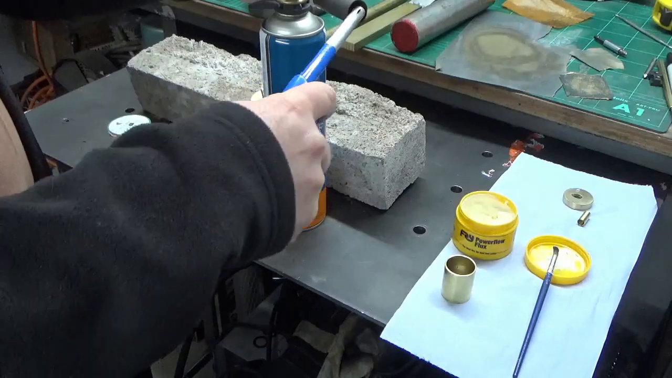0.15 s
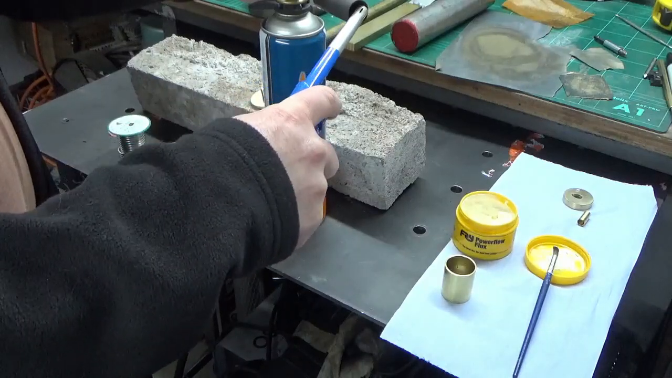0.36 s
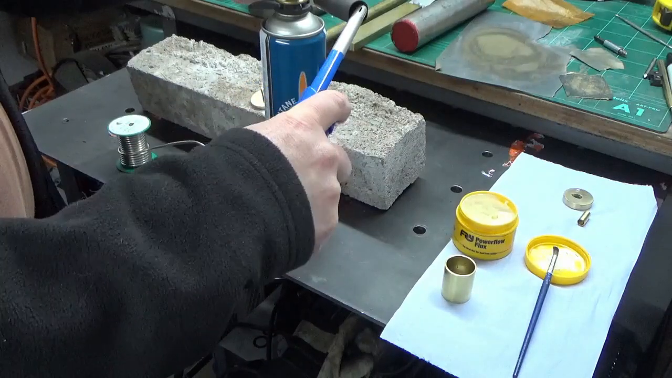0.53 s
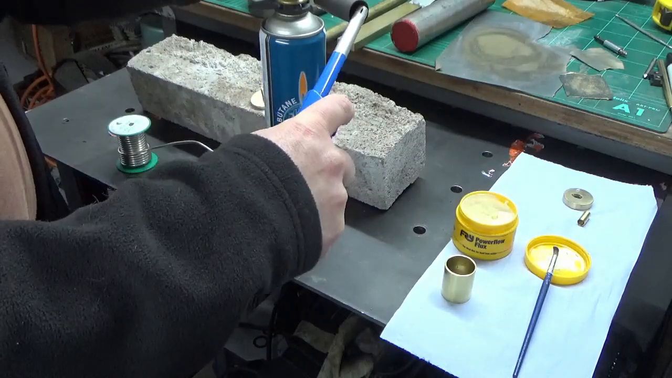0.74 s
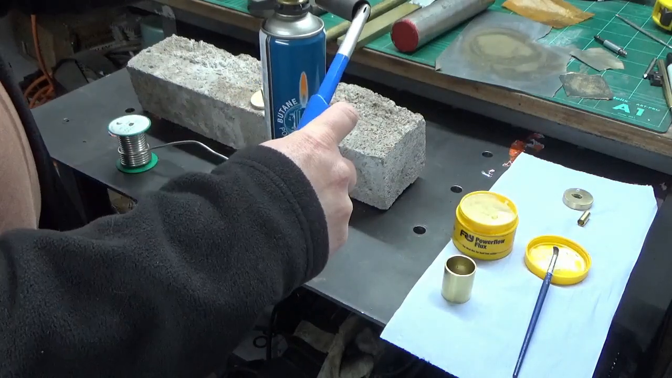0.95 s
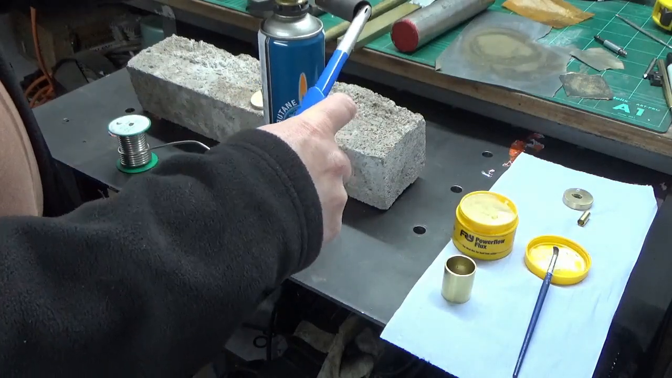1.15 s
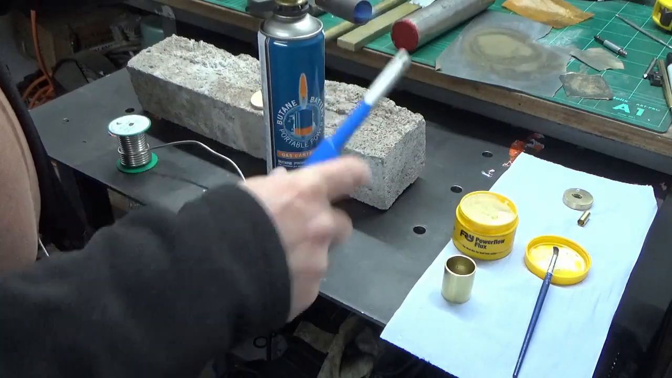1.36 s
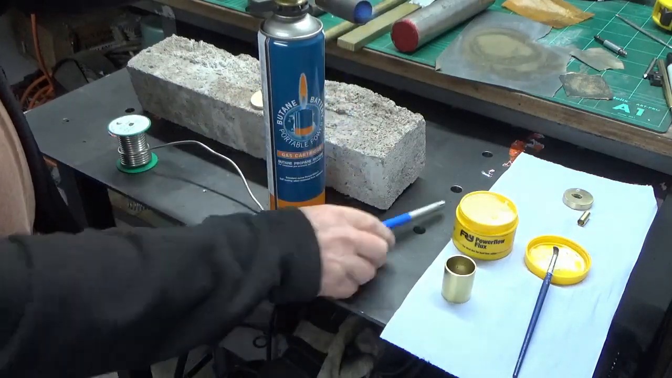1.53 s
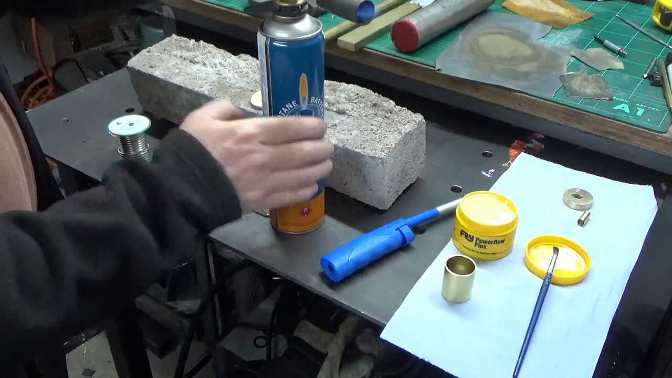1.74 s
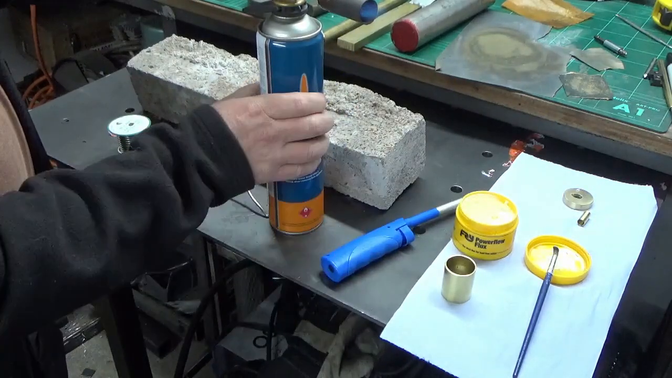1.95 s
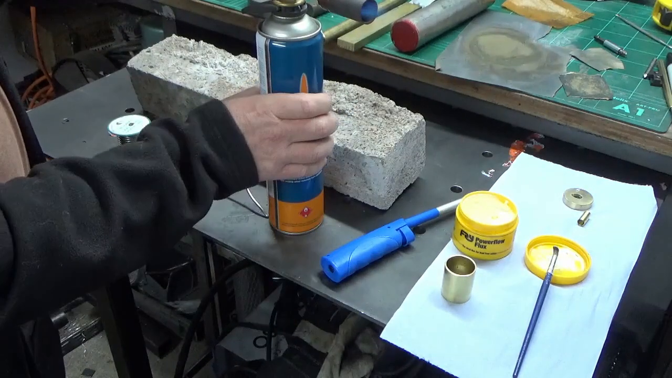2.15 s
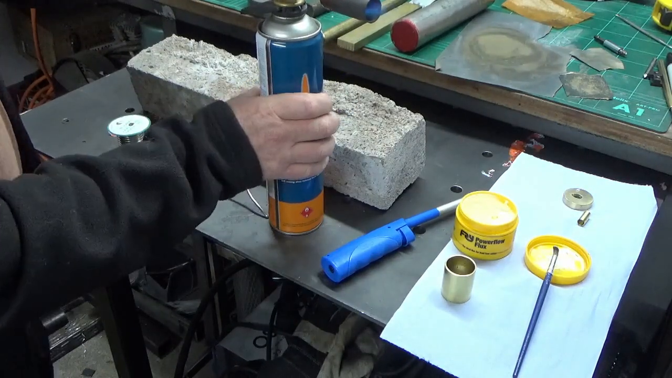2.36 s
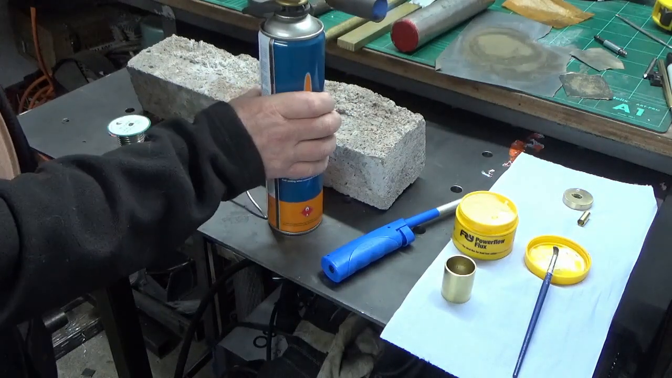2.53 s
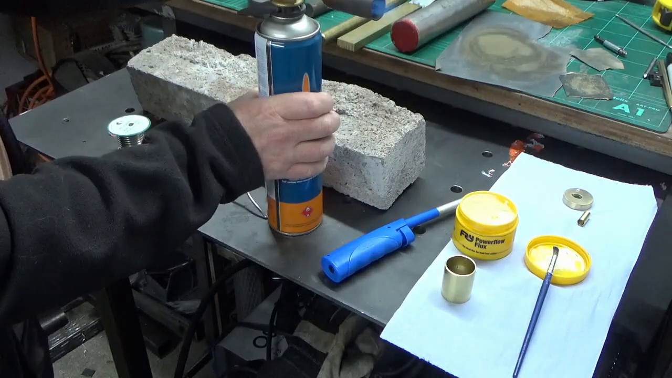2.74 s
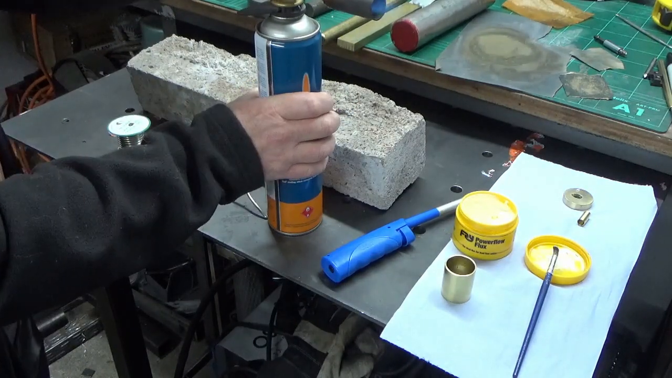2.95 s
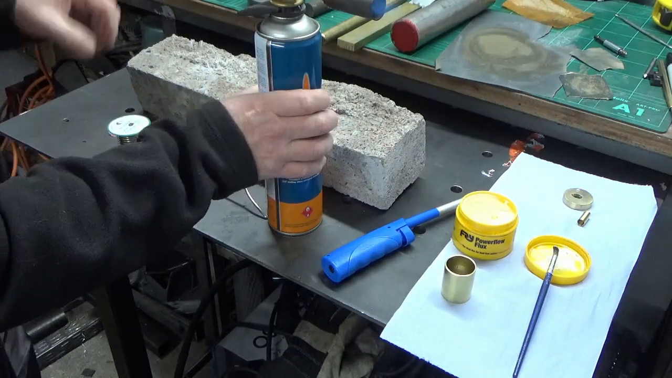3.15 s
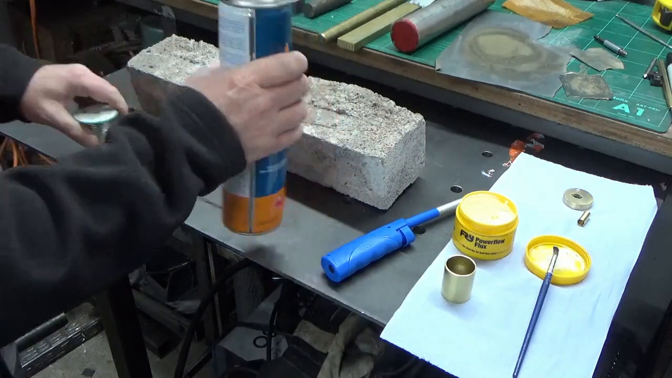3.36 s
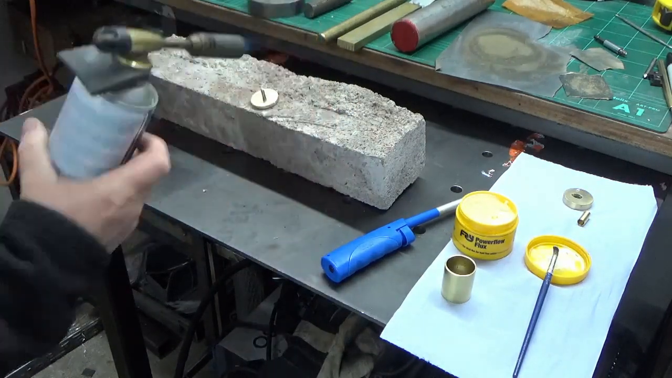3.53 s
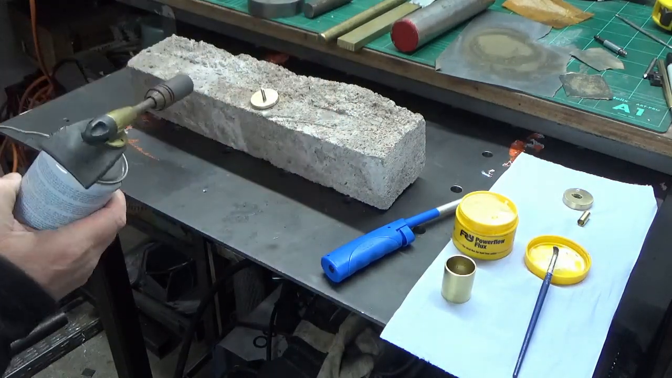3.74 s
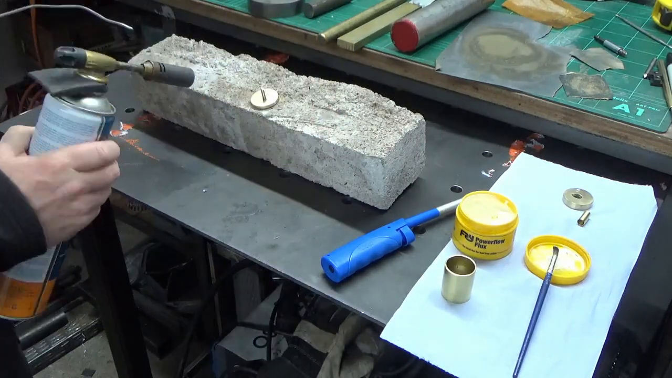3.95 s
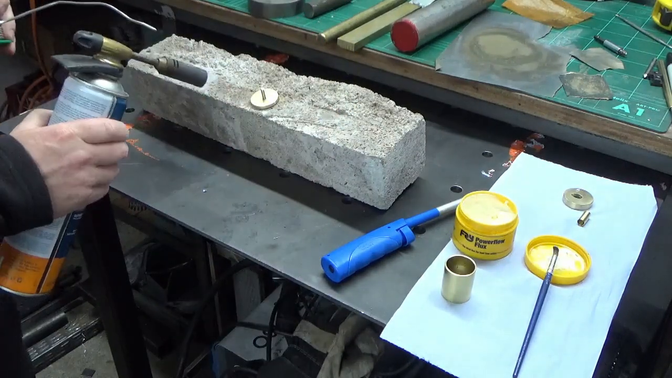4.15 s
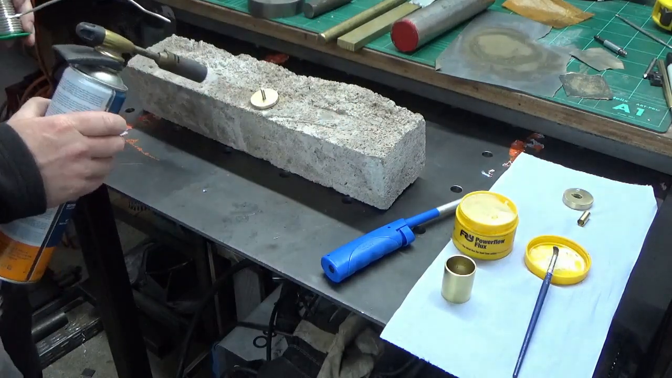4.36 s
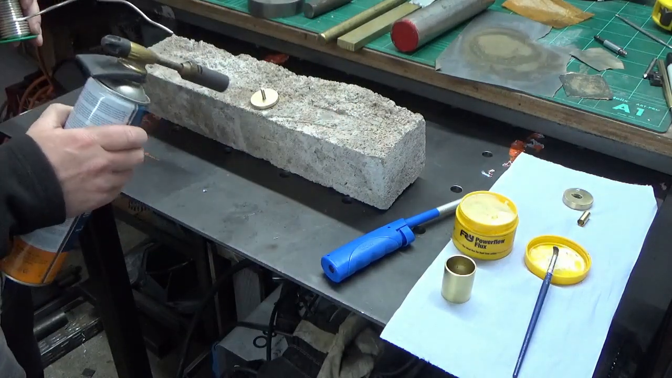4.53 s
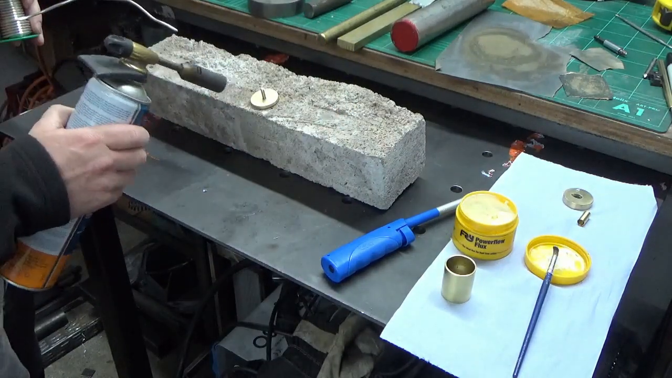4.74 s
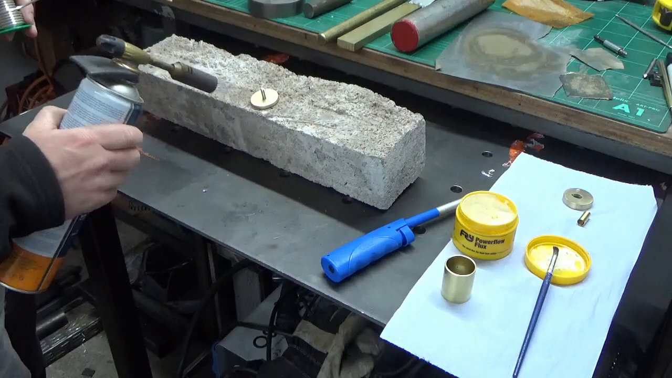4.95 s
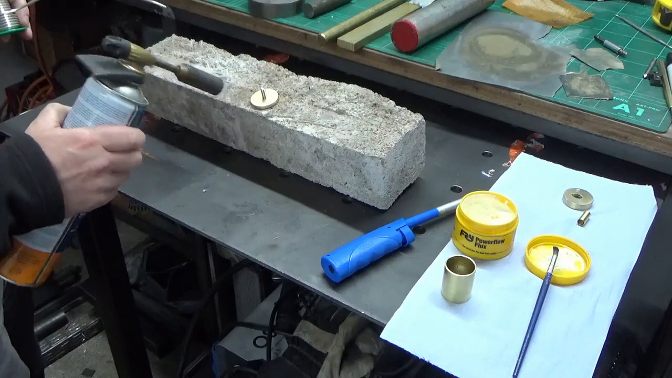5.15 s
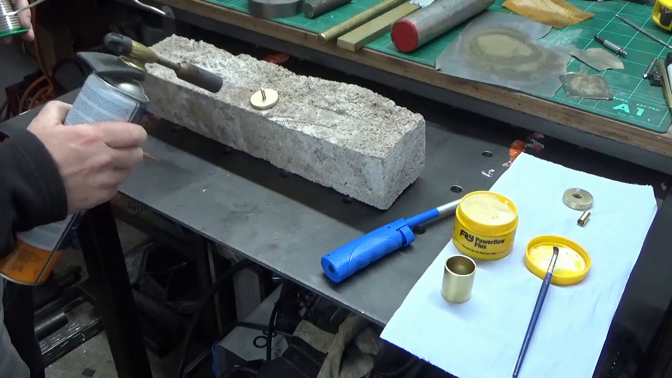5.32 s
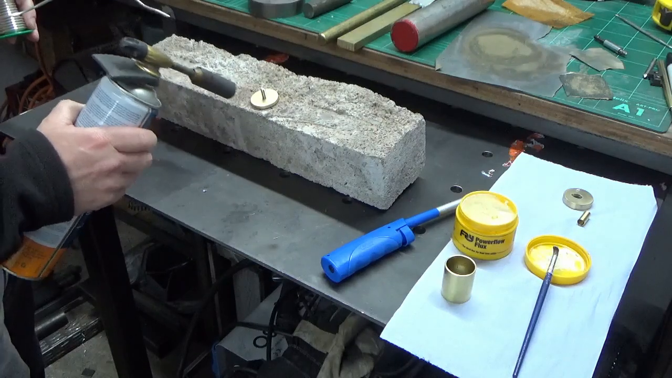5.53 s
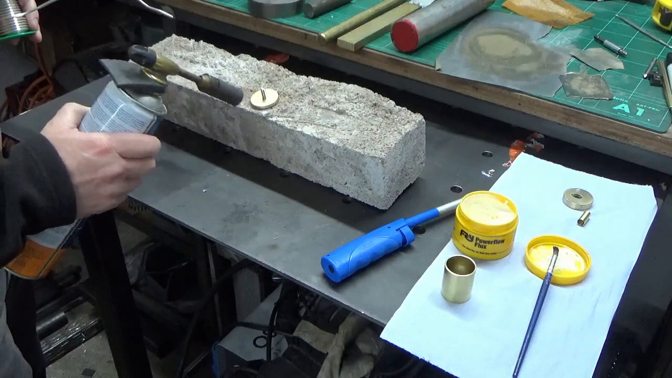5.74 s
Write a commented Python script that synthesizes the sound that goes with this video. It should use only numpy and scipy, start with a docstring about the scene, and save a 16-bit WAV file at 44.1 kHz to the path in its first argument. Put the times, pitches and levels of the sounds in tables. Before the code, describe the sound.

Close stereo pickup at a bench with a short, dry room. Bright, brittle lighter snaps about six per second, each followed by a smaller trigger tick and thin metallic ringing. Puffs of igniting gas merge into a broadband torch rush slightly left. It jumps louder midway, then its tone sweeps as the torch moves and settles into a hollow, resonant, trembling hiss.

```python
"""A butane blowtorch is lit at a workshop bench, over room noise, a faint gas leak and a low hum.
Eight snaps of a piezo lighter: noise cracks and ringing modes, with trigger ticks, rubs and creaks between.
The gas catches in sputtering pressure puffs; filtered noise with tiny pops then roars and hisses.
The valve opens in three surging steps; the torch is lifted, then aimed at a part on a firebrick.
Each position has its own resonances; echoes off bench and brick sweep through the jet noise."""
import sys
import numpy as np
from scipy import signal
from scipy.fft import rfft, irfft
from scipy.io import wavfile
from scipy.ndimage import map_coordinates

SR = 44100
rng = np.random.default_rng(int(sys.argv[2]) if len(sys.argv) > 2 else 0)


def to_wav(sig):
    """Store sig (one row per channel, or 1-D mono) as 16-bit WAV at the path in sys.argv[1].

    Samples outside -1..1 are clipped; the rate is SR.
    """
    pcm = np.clip(np.atleast_2d(sig), -1, 1) * 32767
    pcm = np.round(pcm).astype(np.int16)
    wavfile.write(sys.argv[1], SR, pcm.T)  # frames by channels


N = 259749
TIME = np.arange(N) / SR
FREQ = np.maximum(np.arange(N // 2 + 1) * SR / N, 1)
LIT_S = 1.281


def from_db(db):
    """Decibels to gain."""
    return 10 ** (np.asarray(db) / 20)


def rms_one(x):
    """Scale to unit rms."""
    return x / np.sqrt(np.mean(x ** 2) + 1e-20)


def ramp(start_s, length_s):
    """Even rise from 0 to 1."""
    return np.clip((TIME - start_s) / length_s, 0, 1)


def swell(centre_s, length_s):
    """Smooth bump of height 1; length is the full width at 1/e."""
    return np.exp(-np.minimum((2 * (TIME - centre_s) / length_s) ** 2, 20))


def since(start_s):
    """Seconds elapsed after a moment; 0 before it."""
    return np.maximum(TIME - start_s, 0)


def drift(rate_hz):
    """Slow random motion, rms 1."""
    return rms_one(irfft(rfft(rng.standard_normal(N)) / (1 + (FREQ / rate_hz) ** 2), N))


def gain_at(points):
    """(freq_hz, level_db) table as a gain at every frequency."""
    freq_hz, level_db = np.transpose(points)
    return from_db(np.interp(np.log(FREQ), np.log(freq_hz), level_db))


def colour(x, points):
    """Minimum-phase filter of unit power gain, shaped by a (freq_hz, level_db) table."""
    cepstrum = irfft(np.log(rms_one(gain_at(points))), N)
    fold = np.r_[1, np.full(N // 2, 2), np.zeros(N - N // 2 - 1)]
    response = np.exp(rfft(cepstrum * fold))
    return irfft(rfft(x) * response, N)


def brighten(x, treble_db, corner_hz):
    """Shift the treble by a level that may vary in time."""
    high_pass = signal.butter(3, corner_hz, "high", fs=SR, output="sos")
    return x + (from_db(treble_db) - 1) * signal.sosfiltfilt(high_pass, x)


def read_at(x, seconds):
    """Read both channels at shifted times."""
    return np.array([map_coordinates(channel, [seconds * SR], order=3, mode="mirror") for channel in x])


def stereo_noise(side_db):
    """White noise mostly common to both channels."""
    mid, side = rng.standard_normal((2, N))
    return mid + from_db(side_db) * side * [[1], [-1]]


def room(x, wet_db, t60, direct=1):
    """Direct sound plus a dense decaying tail from bench and walls."""
    age_s = TIME[:SR // 2]
    tail = stereo_noise(-9.0)[:, :len(age_s)] * from_db(-60 * age_s / t60) * (age_s > .001)
    tail = tail / np.sqrt(np.sum(tail ** 2) / 2)
    wet = signal.fftconvolve(np.atleast_2d(x), tail, axes=1)[:, :N]
    return direct * x + from_db(wet_db) * wet


def strikes(rows, t60):
    """Sum of envelopes that jump at each (start_s, level_db) and decay exponentially."""
    envelope = np.zeros(N)
    for start_s, level_db, *_ in rows:
        decay_db = 60 * np.clip(TIME - start_s, 0, 2 * t60) / t60
        envelope += from_db(level_db - decay_db) * (TIME >= start_s)
    return envelope


def ringing(hits, modes, vary_db):
    """Each (start_s, level_db) hit excites every decaying mode at random phase and varied strength."""
    out, age_s = np.zeros(N), TIME[:SR // 2]
    for start_s, hit_db in hits:
        start = round(start_s * SR)
        for freq_hz, mode_db, t60_s in modes:
            height = from_db(hit_db + mode_db + rng.normal(0, vary_db) - 60 * age_s / t60_s)
            out[start:start + len(age_s)] += height * np.sin(2 * np.pi * (freq_hz * age_s + rng.random()))
    return out


# room noise and unlit gas leaking from the jet: freq_hz, level_db (relative, per Hz)
FLOOR_COLOUR = [(25, -8), (100, -7), (300, -5), (700, -3.5), (1200, -2), (2300, -5), (3500, -2.5),
                (5000, -7), (7000, 2.5), (9000, -6), (12300, -3.5), (16000, -5)]
# hum tones: freq_hz, level_db
HUM_TONES = [(61, -86), (75.4, -83.5)]
# bench rumble under the flame: freq_hz, level_db (relative, per Hz)
RUMBLE_COLOUR = [(20, -13), (48, -13), (62, -2), (80, 0), (100, -10), (125, -9), (155, -3), (185, -14),
                 (400, -30), (2000, -70)]
RUMBLE_START_DB, RUMBLE_GROWS_DB_PER_S = -77, 1.5


def workshop(floor_db=-60.0):
    """Coloured noise, two hum tones wavering in level and phase, and a growing rumble from lighting on."""
    air = from_db(floor_db) * colour(stereo_noise(-9), FLOOR_COLOUR)
    hum = np.zeros(N)
    for freq_hz, level_db in HUM_TONES:
        tone = np.sin(2 * np.pi * freq_hz * TIME + .8 * drift(6))
        hum += from_db(level_db + 2 * drift(4)) * np.sqrt(2) * tone
    growth = from_db(RUMBLE_START_DB + RUMBLE_GROWS_DB_PER_S * since(LIT_S))
    rumble = (TIME > LIT_S) * growth * colour(stereo_noise(-8), RUMBLE_COLOUR)
    return air + hum + rumble * from_db([[1.5], [-1.5]])


# finger and sleeve on the lighter: centre_s, length_s, level_db
HAND_RUBS = [(0.088, 0.074, -61), (0.32, 0.063, -56.5), (0.666, 0.017, -50), (0.692, 0.028, -61),
             (0.743, .07, -56.5), (1.106, 0.02, -48), (1.139, 0.047, -51), (1.262, 0.019, -47.5)]
# freq_hz, level_db (relative, per Hz)
RUB_COLOUR = [(100, -12), (400, -6), (750, -0.5), (1200, -3.5), (1900, -4), (2800, -8), (3800, -2),
              (9000, -8), (16000, -3.5)]


def handling():
    """Rubbing friction: soft swells of noise with a fast, random grain."""
    pressure = sum(from_db(level_db) * swell(centre_s, length_s) for centre_s, length_s, level_db in HAND_RUBS)
    grain = from_db(2.5 * drift(130)) * rng.standard_normal(N)
    return room(colour(pressure * grain, RUB_COLOUR), wet_db=0.0, t60=0.33)


# plastic grip: centre_s, length_s, level_db, pitch_hz
GRIP_CREAKS = [(0.097, .022, -61, 2130), (0.669, .014, -58, 1900), (1.262, .01, -56, 1900)]
CREAK_WIDTH_HZ = 380


def creaks():
    """Short squeaks of the plastic grip: sines roughened by random frequency modulation."""
    waver = np.cumsum(CREAK_WIDTH_HZ / 2 * drift(210)) / SR
    out = np.zeros(N)
    for centre_s, length_s, level_db, pitch_hz in GRIP_CREAKS:
        tone = np.sqrt(2) * np.sin(2 * np.pi * (pitch_hz * TIME + waver))
        out += from_db(level_db) * swell(centre_s, length_s) * tone
    return out


# small catches of the trigger: start_s, level_db (relative), spring_db
TRIGGER_CATCHES = [(0.164, -39, -66), (0.2599, -31, -54), (0.329, -37, -66), (0.428, -31, -58),
                   (0.477, -40, -68), (0.5752, -28, -47), (0.592, -35, -56), (0.665, -39, -70),
                   (1.1028, -36, -62), (1.1765, -28, -52)]
# trigger springs back: start_s, level_db (click energy), casing_width_hz, spring_db
TRIGGER_RETURNS = [(0.118, -9.5, 4560, -51), (0.2804, -12, 6500, -48), (0.4404, -11, 2200, -66),
                   (0.599, -10, 3750, -59), (0.8015, -9.5, 3760, -59), (1.0085, -8.5, 3350, -47),
                   (1.1977, -8.5, 4350, -53), (1.3551, -9, 4500, -60)]
SPRING_HZ = 5000


def spring(ring_db=0, t60=0.14):
    """The return spring sings unevenly after each catch and return: a decaying, phase-wavering sine."""
    hits = [(row[0], row[-1]) for row in [*TRIGGER_CATCHES, *TRIGGER_RETURNS]]
    tone = np.sin(2 * np.pi * SPRING_HZ * TIME + .8 * drift(50))
    return from_db(ring_db) * strikes(hits, t60) * tone


CASING_HZ, CASING_LOW_HZ, TICK_SPREAD_S = 10900, 2600, .002   # the small casing radiates little below CASING_LOW_HZ


def ticks(size=512):
    """Each trigger return clicks through a broad casing resonance that smears it, treble first."""
    out, hz = np.zeros(N), np.fft.rfftfreq(size, 1 / SR)
    delay_s = TICK_SPREAD_S * (1 - hz / hz[-1])
    smear = np.exp(-2j * np.pi * np.cumsum(delay_s) * hz[1])
    for start_s, level_db, casing_width_hz, _ in TRIGGER_RETURNS:
        low_cut = hz / (hz - 1j * CASING_LOW_HZ)
        click = irfft(low_cut / (1 + 2j * (hz - CASING_HZ) / casing_width_hz) * smear)
        start = round((start_s - TICK_SPREAD_S / 2) * SR)
        out[start:start + size] += from_db(level_db) * click / np.linalg.norm(click)
    return out


# hammer hits the crystal: start_s, level_db (relative), rattle_t60_s, ring_db (re level_db), treble_db
HAMMER_SNAPS = [(0.0392, -16.5, 0.14, 2.5, -5), (0.204, -19, 0.2, 0, -1), (0.369, -18.5, 0.17, 1, -1),
                (0.522, -17.5, 0.16, -1.5, -1), (0.7182, -18, 0.17, -2, 0.5), (0.9247, -18.5, 0.2, 0.5, 0),
                (1.126, -19.5, 0.2, -6, -0.5), (1.2778, -17, 0.22, -13, -2)]
# freq_hz, level_db (relative), t60_s
LIGHTER_MODES = [(625, -30, 0.55), (793, -30, 0.86), (3900, -23, .1), (5000, -10, 0.18), (5860, -22, 0.18),
                 (7840, -3, .12), (7890, 9, 0.13), (10700, -14, 0.13), (12280, -21, .18), (13700, -17, .15),
                 (15560, -4, .07)]
# colours: freq_hz, level_db (relative, per Hz)
SNAP_COLOUR = [(150, -25.5), (600, -20.5), (2500, -18), (3600, -13), (4800, -3), (6700, -2.5), (7800, -0.5),
               (8900, -8), (10700, 0.5), (16000, -4.5)]
TICK_ECHO_COLOUR = [(150, 8), (700, 7), (2500, -2), (5000, 4.5), (8000, 2.5), (11000, 1), (16000, 1)]
CATCH_COLOUR = [(200, -22), (2000, -6), (3200, -5), (5000, 0), (9000, -4), (16000, -3)]


def lighter(crack_db=-7, rattle_db=-12, ring_db=-23, catch_db=-6, tick_echo_db=-4.5):
    """The hammer cracks on the crystal, its spring rattles on and modes ring; the trigger catches and ticks."""
    contacts = from_db(3.0 * drift(700))
    rattle = sum(strikes([row], row[2]) for row in HAMMER_SNAPS) * contacts
    chatter = rng.choice([-1, 1], N)   # hard plastic chatters at each stop
    crack = from_db(crack_db) * strikes(HAMMER_SNAPS, 0.0022) * chatter
    snap = from_db(rattle_db) * rattle * stereo_noise(-10) + crack

    start_s, level_db, _, strike_db, treble_db = np.transpose(HAMMER_SNAPS)
    latest = np.maximum(np.searchsorted(start_s, TIME, "right") - 1, 0)
    snap = brighten(colour(snap, SNAP_COLOUR), treble_db[latest], corner_hz=9000)
    ring = ringing(zip(start_s, level_db + strike_db + ring_db), LIGHTER_MODES, vary_db=2.0)

    tick = ticks()
    tick_echo = room(colour(tick, TICK_ECHO_COLOUR), wet_db=2, t60=.11, direct=0)
    catch = from_db(catch_db) * strikes(TRIGGER_CATCHES, .006) * chatter
    return (room(snap + ring, wet_db=-10, t60=0.15) + tick + from_db(tick_echo_db) * tick_echo
            + room(colour(catch, CATCH_COLOUR), wet_db=0, t60=0.14))


# the gas catches: centre_s, level_db (relative), half_width_s, tube_ring_db
GAS_PUFFS = [(1.2848, -25, 0.00045, -28.5), (1.2925, -36, 0.00048, -32), (1.2982, -20, 0.00086, -27.5),
             (1.3068, -27, 0.00096, -34), (1.316, -33, 0.00073, -40), (1.3258, -16.5, 0.00054, -33),
             (1.333, -30, .0008, -41), (1.3415, -21, 0.0011, -46), (1.3512, -24, 0.0011, -42),
             (1.3661, -21.5, 0.00065, -31), (1.3738, -30, 0.00043, -29)]
# burner tube resonates near 2 kHz: freq_hz, level_db (relative, per Hz)
PUFF_COLOUR = [(40, -29), (100, -24), (150, -10.5), (200, -13), (300, -7.5), (700, -6), (1400, 1),
               (2000, 10.5), (2900, -5), (8000, -9), (16000, -20)]
# freq_hz, level_db (relative), t60_s
TUBE_MODES = [(1920, -4, 0.018), (2210, -6, 0.016), (1060, -8, 0.021)]
FLARE_DB, FLARE_ATTACK_S, FLARE_HOLD_S, FLARE_T60_S = -46, .003, 0.02, .05   # first gas cloud burns off
AFTERBURN_S, AFTERBURN_LENGTH_S, AFTERBURN_DB = 1.39, .11, -59   # the rest of the cloud


def ignition(gain_db=-6, turbulence=0.25, tube_db=0):
    """A noise flare; each gas pocket fires one swing of pressure and rings the burner tube."""
    flare = from_db(FLARE_DB - 60 * since(LIT_S + FLARE_ATTACK_S + FLARE_HOLD_S) / FLARE_T60_S)
    afterburn = from_db(AFTERBURN_DB) * swell(AFTERBURN_S, AFTERBURN_LENGTH_S)
    pressure = ramp(LIT_S, FLARE_ATTACK_S) * (flare + afterburn) * rng.standard_normal(N)
    for centre_s, level_db, half_width_s, _ in GAS_PUFFS:
        phase = np.clip((TIME - centre_s) / half_width_s, -20, 20)
        swing = 2 * phase + turbulence * rng.standard_normal(N)
        pressure += from_db(level_db + gain_db) * np.exp(-phase ** 2) * swing
    hits = [(centre_s - half_width_s, ring_db + tube_db) for centre_s, _, half_width_s, ring_db in GAS_PUFFS]
    tube = ringing(hits, TUBE_MODES, vary_db=2)
    heard = room(colour(pressure, PUFF_COLOUR) + tube, wet_db=-9, t60=.18)
    return heard * from_db([[1], [-1]])


# reflections as the torch swings past things:
# centre_s, length_s, level_db, centre_hz, glide_octaves_per_s, width_hz
REFLECTION_GLINTS = [(3.36, .11, -41, 9500, .3, 1900), (3.477, .1, -35, 10240, 0.26, 2200),
                     (3.76, .36, -39.5, 879, 0, 248), (3.916, 0.11, -40.5, 3390, 0.82, 600)]


def glints():
    """Brief reflections of the jet: swells of band noise whose centre may glide."""
    out = np.zeros((2, N))
    for centre_s, length_s, level_db, centre_hz, glide, width_hz in REFLECTION_GLINTS:
        hz = centre_hz * 2 ** (glide * np.clip(TIME - centre_s, -length_s, length_s))
        # one-sided band made 1.5 widths up, then shifted onto the gliding centre
        window = np.exp(-np.minimum((2 * FREQ / width_hz - 3) ** 2, 40))
        band = np.fft.ifft(rfft(stereo_noise(-11)) * window, N)
        shift = np.exp(2j * np.pi * np.cumsum(hz - 3 * width_hz / 2) / SR)
        out += from_db(level_db) * swell(centre_s, length_s) * rms_one((band * shift).real)
    return out


# start_s, turn_length_s, lasting_rise_db, extra_surge_db
VALVE_TURNS = [(1.38, 0.25, 2.6, 0.8), (1.95, 0.1, 1.5, 1), (2.605, 0.042, 4.5, 5.5)]
SURGE_HOLD_S, SURGE_SETTLE_S = 0.086, 0.2   # settle: time constant


def gas_flow_db():
    """Flow re its final value: each valve turn raises it, with a surge that holds, then settles."""
    flow_db = np.zeros(N)
    for start_s, length_s, rise_db, surge_db in VALVE_TURNS:
        settle = np.exp(-since(start_s + length_s + SURGE_HOLD_S) / SURGE_SETTLE_S)
        flow_db += ramp(start_s, length_s) * (rise_db + surge_db * settle) - rise_db
    return flow_db


def clutter(echo_db, count=30):
    """Response of short echoes off tools and tins, which ripple the treble finely."""
    taps = np.zeros(N)
    places = (rng.uniform(.002, .02, count) * SR).astype(int)
    taps[places] = rng.choice([-1, 1], count) * from_db(echo_db) / np.sqrt(count)
    return 1 + rfft(taps) * FREQ ** 2 / (FREQ ** 2 + 1800 ** 2)


# diffuse share of the torch: freq_hz, side_minus_mid_db
DIFFUSE_SHARE = [(100, -1), (300, -18), (700, -16), (1400, -10.5), (2600, -8.5), (5000, -10),
                 (10000, -11.5), (16000, -13)]


def torch_noise(source, spectrum, peaks, pan):
    """Stereo spectrum of one position: resonances and notches shape direct and diffuse noise."""
    peaks_db = sum(level_db / (1 + (2 * (FREQ - freq_hz) / width_hz) ** 2) for freq_hz, width_hz, level_db in peaks)
    side = gain_at(DIFFUSE_SHARE) * rfft(rng.standard_normal(N)) * [[1], [-1]]
    direct = source * clutter(echo_db=-7)
    return gain_at(spectrum) * from_db(peaks_db) * (direct + side) * gain_at(pan) ** np.array([[.5], [-.5]])


# noise colour per position: freq_hz, level_db (relative, per Hz)
STANDING_COLOUR = [(60, -38.5), (190, -28.5), (240, -15.0), (450, -3.3), (800, 0.0), (1400, -2.5),
                   (2200, -13.0), (3800, -5.9), (7000, -13.4), (10500, -10.8), (12300, -17.0),
                   (16000, -16.9)]
MID_AIR_COLOUR = [(60, -40.9), (170, -34), (240, -17.0), (450, -5), (800, 1.5), (1400, -5.5), (2200, -11.5),
                  (3800, -9.5), (5300, -13.5), (7000, -15), (8200, -16), (10500, -15.5), (12300, -23.5),
                  (16000, -19.5)]
AIMED_COLOUR = [(60, -39.1), (170, -29.1), (240, -15.0), (450, -3.8), (800, -4.2), (1400, 0.0),
                (2200, -5.0), (3800, -6), (5500, -11), (7000, -12.6), (10500, -7.6), (12300, -15.4),
                (14000, -15.6), (16000, -17.8)]
# resonances (+) and echo notches (-): freq_hz, width_hz, level_db
STANDING_PEAKS = [(151, 30, 6.5), (266, 33, 6.5), (329, 65, 4), (457, 61, 5), (545, 74, -1.5), (625, 25, 7),
                  (778, 40, 4.5), (990, 32, -14), (1039, 79, 9.5), (1093, 33, -9.5), (1367, 19, -30),
                  (2070, 350, 9.5), (2330, 82, 9.5), (2630, 50, 3.5), (3225, 32, -13), (3700, 220, -4.5),
                  (4100, 36, -1.5), (4550, 67, -12), (6260, 90, 3), (6370, 140, -7), (6530, 160, 3),
                  (7300, 330, -1), (8060, 103, 4.5), (8720, 330, 5.5), (9900, 180, 3), (10470, 160, 2.5)]
MID_AIR_PEAKS = [(544, 40, -14), (1041, 70, -7), (1640, 120, -2), (2500, 530, 5.5), (3630, 68, -1),
                 (4040, 190, -2), (4830, 160, 1), (5760, 150, -2), (5940, 170, 5.5)]
AIMED_PEAKS = [(185, 52, -16), (264, 38, 5.5), (470, 46, 6.5), (689, 93, 7), (805, 61, 13.5),
               (1044, 29, 6.5), (1150, 56, -16), (1208, 33, 10), (1381, 25, 4), (1556, 56, -14.5),
               (1648, 40, 5.5), (1776, 54, 10), (1945, 116, 6), (2170, 49, -4), (2330, 64, 4),
               (2550, 32, -7), (2757, 34, -19), (2787, 170, 12), (3110, 71, -10), (3670, 69, -10),
               (3900, 330, -7), (4550, 33, 6.5), (4900, 38, -4), (5450, 93, 3.5), (5786, 73, -6),
               (6250, 160, 4.5), (7560, 82, 6.5), (9100, 840, -4), (11400, 250, 2.5)]
# freq_hz, left_minus_right_db
STANDING_PAN = [(60, 3.0), (110, 4), (200, 5), (380, 3.5), (700, 3.5), (1290, -0.5), (2380, 0.5), (4400, 0),
                (8120, -0.5), (15000, -0.5)]
MOVED_PAN = [(60, 4.8), (110, 5.5), (200, 4.3), (380, 5.1), (700, 5.7), (1290, 1.1), (2380, 2.7),
             (4400, 0.9), (8120, 1.4), (15000, 1.1)]   # mid-air and aimed
# rows standing, mid-air, aimed, before flow and flame changes: roar_db, rush_db, hiss_db
POSITION_LEVELS = [(-38, -32, -36.0), (-36.5, -33, -37.5), (-38, -31.5, -37)]


def torch_layers(source, shares):
    """Flame roar, burner rush and jet hiss: three bands, crossfaded between the positions."""
    places = [torch_noise(source, STANDING_COLOUR, STANDING_PEAKS, STANDING_PAN),
              torch_noise(source, MID_AIR_COLOUR, MID_AIR_PEAKS, MOVED_PAN),
              torch_noise(source, AIMED_COLOUR, AIMED_PEAKS, MOVED_PAN)]
    below = 1 / (1 + (FREQ / 900) ** 6)
    above = 1 - 1 / (1 + (FREQ / 7000) ** 6)
    layers = []
    for levels_db, band in zip(np.transpose(POSITION_LEVELS), (below, 1 - below - above, above)):
        layers.append(sum(share * from_db(level_db) * rms_one(irfft(place * band, N))
                          for share, level_db, place in zip(shares, levels_db, places)))
    return layers


BENCH_LAG_S, AIMED_LAG_S = 0.001517, 0.000924   # before and after aiming


def add_bench_echo(jet, lifted, aimed):
    """The bench echo's delay sweeps as the torch is aimed and trembles with the hand."""
    tremble_s = 6e-6 * (lifted + aimed) * drift(2)
    lag_s = BENCH_LAG_S + (AIMED_LAG_S - BENCH_LAG_S) * aimed + tremble_s
    return jet + (.12 + .2 * (lifted - aimed)) * read_at(jet, TIME - lag_s)


# echo off the brick: time_s, delay_s, share of the direct sound
BRICK_ECHO = [(3.45, .00042, 0), (3.62, .00039, .24), (3.82, .00036, .25), (3.94, .00029, .38),
              (4.02, .000215, .36), (4.15, .000194, .28), (4.32, .000185, .22), (5.85, .000177, .2)]
BRICK_DULL_DB, BRICK_DULL_HZ = -6, 4500   # the porous brick scatters treble


def add_brick_echo(jet):
    """The brick's echo combs the jet noise; the comb rises as the nozzle nears and the delay shrinks."""
    time_s, delay_s, share = np.transpose(BRICK_ECHO)
    dulled = brighten(jet, BRICK_DULL_DB, BRICK_DULL_HZ)
    echo = read_at(dulled, TIME - np.interp(TIME, time_s, delay_s))
    return jet + np.interp(TIME, time_s, share) * echo


LIFT_S, LIFT_TAKES_S, AIM_S, AIM_TAKES_S = 3.36, 0.33, 3.81, 0.35
ROAR_FOLLOWS, RUSH_FOLLOWS, HISS_FOLLOWS = 0.22, 0.79, 0.87   # dB per dB of flow
TOP_FOLLOWS, TOP_HZ = 0.15, 11900   # extra dB above TOP_HZ per dB of flow
HEATING_DB_PER_S = 0.84   # roar and rush grow once on the brick
DIP_S, DIP_LENGTH_S, DIP_DB = 3, 0.057, -3.0   # roar and rush dip briefly
WANDER_SHARE = .008   # rms pitch waver once lifted


def torch(pops_per_s=700, flutter_db=0.72, grow_s=0.13, start_db=-11):
    """Turbulent gas noise and tiny flame pops, led by the gas flow and heard in each position in turn."""
    pops = (rng.random(N) < pops_per_s / SR) * rng.uniform(0.47, 1, N)
    source = rfft(rms_one(rng.standard_normal(N) - .33 * rms_one(pops)))
    lifted, aimed = ramp(LIFT_S, LIFT_TAKES_S), ramp(AIM_S, AIM_TAKES_S)
    roar, rush, hiss = torch_layers(source, [1 - lifted, lifted - aimed, aimed])

    flow_db = gas_flow_db()
    flutter = flutter_db * drift(40)   # the flame shakes the jet with it
    flame_db = HEATING_DB_PER_S * since(AIM_S + AIM_TAKES_S) + DIP_DB * swell(DIP_S, DIP_LENGTH_S)
    roar = roar * from_db(ROAR_FOLLOWS * flow_db + flame_db + flutter)
    rush = rush * from_db(RUSH_FOLLOWS * flow_db + flame_db + 1.12 * flutter)
    hiss = hiss * from_db(HISS_FOLLOWS * flow_db + 1.5 * flutter)

    jet = add_brick_echo(add_bench_echo(rush + hiss, lifted, aimed))
    jet = brighten(jet, TOP_FOLLOWS * flow_db, TOP_HZ)
    wander_s = np.cumsum(WANDER_SHARE * lifted * drift(3.65)) / SR
    heard = read_at(roar + jet, TIME - wander_s)
    return heard * from_db(start_db * (1 - ramp(LIT_S, grow_s))) * (TIME > LIT_S)


def scene():
    """Room, hand, lighter, ignition and torch."""
    return workshop() + handling() + creaks() + spring() + lighter() + ignition() + glints() + torch()


def record(dry):
    """Steep low-pass at 15850 Hz."""
    return signal.sosfilt(signal.ellip(12, .1, 80, 15850, fs=SR, output="sos"), dry)


dry = scene()
out = record(dry)
to_wav(out)
```